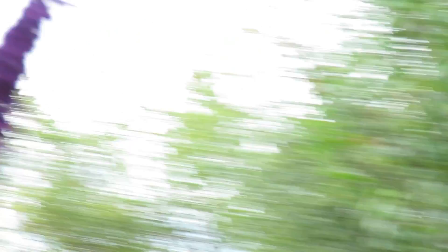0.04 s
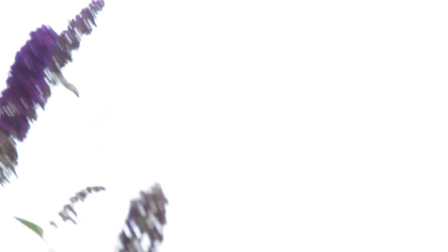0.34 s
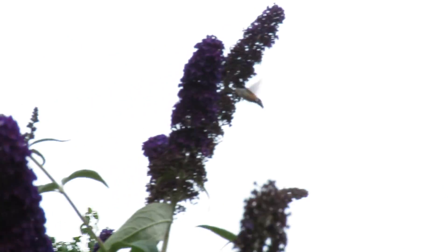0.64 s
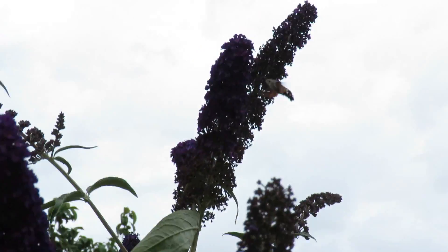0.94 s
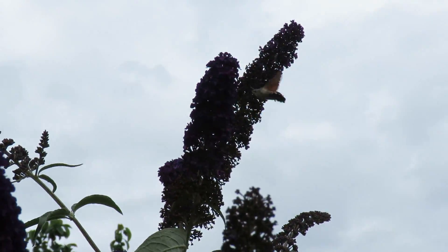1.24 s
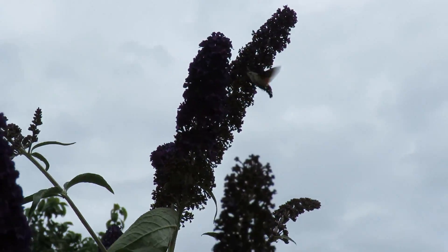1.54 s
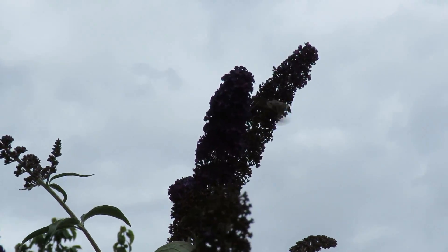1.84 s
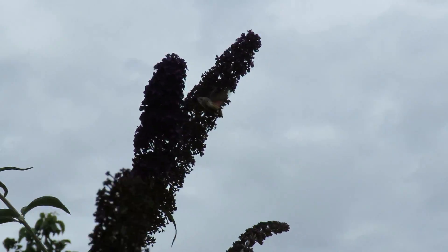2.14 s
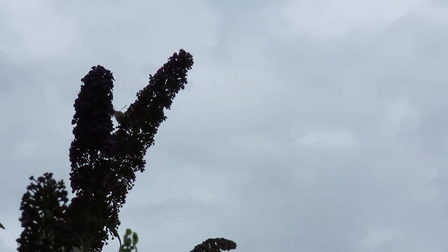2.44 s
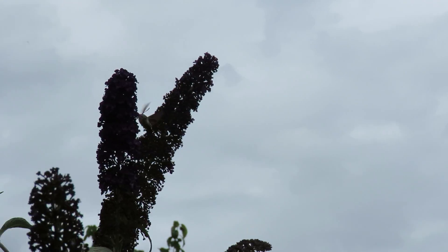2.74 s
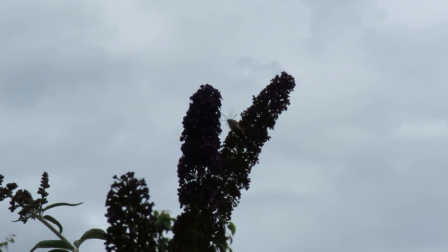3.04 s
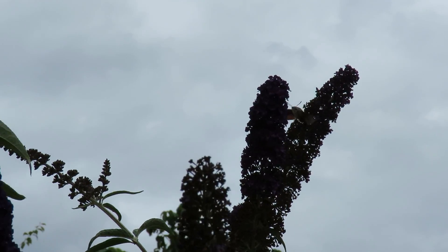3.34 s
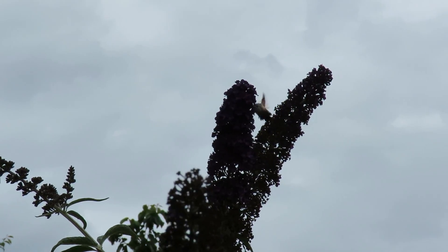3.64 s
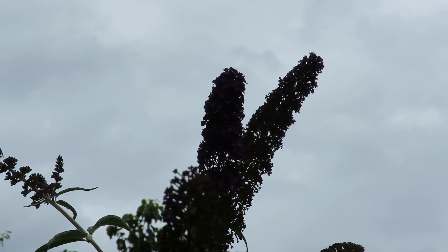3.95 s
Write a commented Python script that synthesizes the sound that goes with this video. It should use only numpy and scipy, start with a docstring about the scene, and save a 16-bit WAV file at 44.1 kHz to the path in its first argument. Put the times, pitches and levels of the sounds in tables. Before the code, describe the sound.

Uneven wind gusts rumble and pop against a handheld camera's microphone outdoors, strongest in the middle and weaker at the end. A faint lens whine and hand rubbing come first, over softly hissing leaves and a far traffic murmur.

```python
"""Gusty wind in a garden

Gusts buffet a camera's two microphone openings; each eddy (a swirl of air) hits one, then the other.
Behind them far traffic murmurs, leaves hiss, the camera rubs in the hand and its lens motor whines.
The hardest buffets drive the recorder's limiter, which turns the whole garden down for a moment."""
import sys
import numpy as np
from scipy import signal
from scipy.fft import rfft, irfft
from scipy.io import wavfile
from scipy.ndimage import uniform_filter1d

SR = 44100
rng = np.random.default_rng(int(sys.argv[2]) if len(sys.argv) > 2 else 0)


def master(y):
    """Save y as 16-bit WAV."""
    cut = np.clip(np.atleast_2d(y).T, -1, 1)
    pcm = np.round(cut * 32767)  # scale
    wavfile.write(sys.argv[1], SR, pcm.astype(np.int16))


N = 176400
TIME = np.arange(N) / SR


def amp(db):
    """Turns decibels into a gain."""
    return 10 ** (np.asarray(db) / 20)


def unit_rms(x):
    """Scales a signal to an average power of 1."""
    return x / np.sqrt(np.mean(x ** 2) + 1e-20)


def at_hz(points, hz):
    """Reads a curve along a logarithmic frequency axis."""
    f, value = np.transpose(points)
    return np.interp(np.log(hz + 1), np.log(f + 1), value)


def over_time(points):
    """Reads a curve at every sample."""
    return np.interp(TIME, *np.transpose(points))


def add(mix, start_s, sound):
    """Mixes in a stereo sound."""
    part = mix[:, max(round(start_s * SR), 0):][:, :sound.shape[1]]
    part += sound[:, :part.shape[1]]


def wander(rate_hz, size=N):
    """Smooth random motion up to about the given rate."""
    hz = np.fft.rfftfreq(size, 1 / SR)
    return unit_rms(irfft(rfft(rng.standard_normal(size)) * np.exp(-(hz / rate_hz) ** 2), size))


def stereo_noise(spectrum, alike, lag_s=0, speed=1, size=N):
    """Shaped noise, partly shared by both sides (alike: 0 to 1); the left hears it lag_s later."""
    hz = np.fft.rfftfreq(size, 1 / SR)
    shared, separate = rfft(rng.standard_normal((2, size)))
    likeness = alike if np.isscalar(alike) else at_hz(alike, hz)
    left = shared * np.exp(-2j * np.pi * hz * lag_s)
    right = likeness * shared + np.sqrt(1 - likeness ** 2) * separate
    return unit_rms(irfft(np.array([left, right]) * amp(at_hz(spectrum, hz / speed)), size))


def crossing(lag_ms, loss_db_per_ms=0.8):
    """Left and right gains: an eddy weakens on its way, so the later side gets less."""
    return amp(loss_db_per_ms * lag_ms * np.array([[-.5], [.5]]))


def swing(db, hz, half_ms, lag_ms):
    """One short pressure swing at both openings, centred 0.05 s after its start."""
    ms = np.arange(-50, 50, 1000 / SR) - np.array([[lag_ms], [-lag_ms]]) / 2
    return crossing(lag_ms) * amp(db) * np.sin(2 * np.pi * hz * ms / 1000) / np.cosh(ms / half_ms)


# Tone of the traffic: f/Hz, relative level/dB
TRAFFIC_TONE = [(20, -53), (55, -3.5), (120, 2), (250, -1.5), (480, -2.5), (750, -5), (960, -11.5),
                (1030, -5.5), (1100, -13.5), (1500, -18.5), (2200, -29.5), (5000, -63.5)]
# How loud it is: t/s, level/dB
TRAFFIC_LEVEL = [(0, -48.5), (.6, -50.5), (1.3, -49.5), (2.2, -52), (3.0, -52), (3.6, -50), (4, -52)]
def traffic():
    """Far roads make a dull murmur from all around."""
    return amp(over_time(TRAFFIC_LEVEL)) * stereo_noise(TRAFFIC_TONE, alike=0.41)


# Tone of the leaves: f/Hz, relative level/dB
LEAF_TONE = [(300, -11.5), (1000, 5), (1900, 1.5), (3900, -1.5), (5000, -4.5), (6500, -9), (11000, -16),
             (13000, -16.5), (14500, -27)]
# How loud they are: t/s, level/dB
LEAF_LEVEL = [(0, -57), (.4, -56), (1.8, -56), (2.9, -56), (4, -56.8)]
# How alike left and right are: f/Hz, likeness (0 to 1)
LEAF_LIKENESS = [(500, 0.37), (2200, 0.2), (3500, 0.53), (5000, 0.79), (6500, .38), (9000, .3),
                 (12000, 0.62), (14000, .85)]
def leaves():
    """Leaves in the bushes make a wide, even hiss, a little to the right."""
    return amp(over_time(LEAF_LEVEL)) * stereo_noise(LEAF_TONE, LEAF_LIKENESS, lag_s=30.3e-6)


# The motor's whine: t/s, level/dB, f/Hz
MOTOR_WHINE = [(0, -72, 1567), (.2, -56, 1493), (.28, -71, 1548), (.42, -54.5, 1601), (.57, -65, 1600),
               (.66, -54.5, 1615), (0.799, -97, 1555), (.97, -63.5, 1485), (1.5, -61.5, 1480),
               (1.75, -80, 1496)]
def lens_motor(width_hz=135):
    """A faint, unsteady whine whose pitch follows the motor's speed."""
    times, db, hz = np.transpose(MOTOR_WHINE)
    phase = 2 * np.pi * np.cumsum(np.interp(TIME, times, hz)) / SR
    whine = wander(width_hz) * np.cos(phase) + wander(width_hz) * np.sin(phase)
    return amp(np.interp(TIME, times, db)) * whine


# Tone of the rubbed camera body: f/Hz, relative level/dB
RUB_TONE = [(200, -12), (700, -13), (1150, -0.5), (1400, -1.5), (1800, -7), (2100, -12.5), (4000, -15.5),
            (8000, -61)]
# How loud the rubbing is: t/s, level/dB
RUB_LEVEL = [(0, -61.5), (.06, -50.5), (.26, -62.5), (.41, -54), (.57, -62), (.66, -56.5), (.76, -61.5),
             (1.1, -60), (1.4, -56), (1.75, -68), (4, -64.5)]
# Small ticks of the body: t/s, level/dB
BODY_TICKS = [(0.4002, -38), (0.4054, -32.5)]
def handling(grain_db=2.5):
    """The camera body carries the hand's uneven rubbing and small ticks to both microphones."""
    rub = stereo_noise(RUB_TONE, alike=0.95) * amp(grain_db * wander(rate_hz=60))
    out = amp(over_time(RUB_LEVEL)) * unit_rms(rub)
    for centre_s, db in BODY_TICKS:
        add(out, centre_s - .05, swing(db, hz=1590, half_ms=0.41, lag_ms=0))
    return out


# Tone of swirling air at speed 1: f/Hz, relative level/dB
EDDY_TONE = [(18, -53.5), (35, -26.5), (70, -15), (130, 3.5), (290, 1.5), (420, -4.5), (540, -12.5),
             (780, -28), (2000, -46), (4000, -87)]
# How alike it is at the two openings: f/Hz, likeness (0 to 1)
EDDY_LIKENESS = [(50, 0.76), (150, 0.78), (300, 0.69), (600, 0.51)]
def turbulence(speed, lag_ms, size, steadying=0.59, lump_db=4):
    """A stream of eddies makes lumpy pressure noise; speed multiplies its frequencies."""
    pressure = crossing(lag_ms) * stereo_noise(EDDY_TONE, EDDY_LIKENESS, lag_ms / 1000, speed, size)
    power = (pressure ** 2).mean(0)
    power = uniform_filter1d(uniform_filter1d(power, size=600), size=600)
    steadied = pressure / (abs(power) + 1e-9) ** (steadying / 2)
    lumps = amp(lump_db * np.tanh(wander(rate_hz=68.5, size=size)))
    return unit_rms(steadied * lumps)


# Light air: t/s, level/dB
BREEZE_LEVEL = [(0, -59), (.4, -49.5), (.7, -47), (1.0, -57.5), (1.2, -50), (1.33, -55), (1.56, -41.5),
                (2.1, -32.5), (2.28, -43), (2.6, -46), (2.67, -30), (3.05, -53), (3.33, -50.5), (3.55, -46),
                (3.75, -56.5), (4, -70)]
# Gusts: t/s, length/s, level/dB, speed factor, left delay/ms
WIND_GUSTS = [(0.245, 0.076, -43, 0.53, 2.3), (0.506, 0.021, -37, 0.68, 1.4), (.645, 0.076, -29, 0.7, 2),
              (0.74, 0.099, -32, 0.58, 3), (0.83, 0.13, -39.5, 0.54, 3), (1.087, .05, -43.5, 0.51, 1.5),
              (1.398, 0.1, -36, 0.59, 1.5), (1.468, 0.019, -29.5, 0.92, 1), (1.565, 0.15, -30, 0.96, 1.0),
              (1.701, 0.05, -37.5, 0.86, 0.6), (1.785, 0.096, -23.5, 0.89, 1.46),
              (1.916, 0.049, -18, 1, 1.63), (1.985, 0.065, -22, 0.85, -1.4),
              (2.058, 0.072, -16.5, 1.005, -1.77), (2.146, 0.052, -27.5, 1.06, 0.5),
              (2.213, 0.072, -38, 0.86, 0.6), (2.39, 0.039, -27, 1.3, 0), (2.438, 0.017, -20.5, 2.2, 0.5),
              (2.474, 0.091, -33, 0.89, 0.2), (2.676, 0.077, -21.5, 1.5, 0.3),
              (2.721, 0.096, -22.5, 1.32, -0.03), (2.823, 0.095, -30.5, 1, 0.2),
              (2.941, 0.13, -36.5, 0.94, 0.1), (3.138, 0.14, -40, 0.92, 0.54),
              (3.638, 0.043, -34.5, 0.81, 0.33), (3.706, 0.07, -42.5, 0.86, -0.05)]
# Single hard eddies: t/s, level/dB, f/Hz, half length/ms, left delay/ms
HARD_EDDIES = [(0.465, -14.5, 201, 1.74, 2.72), (0.653, -17.5, 186, 3.2, 3.5), (.672, -14, 168, 1.1, 1),
               (0.71, -16.5, 175, 2.6, 2.5), (0.7912, -8.5, 752, 0.48, 0.24),
               (0.7914, 0, 185.6, 1.12, 2.23), (.811, -19.5, 172, 2.8, 4.5), (1.196, -27.5, 166, 1.4, 1.4),
               (1.445, -19, 285, 1.1, 0.9), (1.571, -13.5, 300, 1.0, 1), (1.597, -11.5, 283, 1.34, 1.6),
               (1.646, -12.5, 201, 1.1, 2), (1.810, -8.5, 195, 1.66, 1.5), (1.833, -10, 231, 1.2, 2),
               (1.863, -4.5, 333, 0.85, 0.6), (1.931, -9, 155, 2.5, 0.5), (1.935, -2.5, 383, 2.13, 1.6),
               (2.028, -11, 288, 1.5, -1), (2.071, -17.5, 540, 1.4, -0.2), (2.192, -14.5, 350, 0.84, 0.2),
               (2.258, -23, 295, 2.1, 0.8), (2.3, -29.5, 405, 1.6, 2), (2.324, -28, 351, 1.6, 2.4),
               (2.4171, -2.5, 374, 0.65, 0.45), (2.439, 2.5, 470, 0.39, 0.4),
               (2.4416, -4.5, 617, 2.45, 0.4), (2.447, -1.5, 293, 1.5, 0.55), (2.682, -8, 284, 1.87, 0.42),
               (2.717, -7, 764, 0.6, 0.4), (2.740, -9.5, 415, 1.2, 0.7), (2.786, -13, 306, 3.4, 0.3),
               (2.881, -22, 240, 1.1, 0.6), (2.89, -17, 235, 0.85, 2.2), (2.904, -7, 361, 1.2, 1.26),
               (2.939, -21.5, 277, 1.3, 0.5), (2.958, -20, 243, 1.4, 0.5), (3.26, -28, 242, 2.3, 0.5),
               (3.403, -27.5, 222, 1.45, 0.63), (3.517, -28.5, 225, 1.14, -0.1),
               (3.587, -28.5, 267.6, 1.9, 0)]
def wind(rise_s=0.0056, fall_s=0.0056):
    """Air pushes on the openings: a breeze, gusts that rise, hold and fall, and hard eddies."""
    out = amp(over_time(BREEZE_LEVEL)) * turbulence(speed=0.76, lag_ms=0.47, size=N)
    t = np.arange(2 ** 14) / SR
    for start_s, length_s, db, speed, lag_ms in WIND_GUSTS:
        rise = np.sin(np.pi / 2 * np.minimum(t / rise_s, 1))
        shape = rise * np.exp(-np.maximum(t - length_s, 0) / fall_s)
        gust = shape * turbulence(speed, lag_ms, size=len(t))
        add(out, start_s, amp(db) * unit_rms(gust) * np.sqrt(np.mean(shape ** 2)))
    for centre_s, *eddy in HARD_EDDIES:
        add(out, centre_s - .05, swing(*eddy))
    return out


# How much wind gets through the openings: f/Hz, gain/dB
OPENING_GAIN = [(450, 1), (560, -8), (720, -10), (2500, -8.5)]
def openings(air, widen_db=3):
    """The microphone openings dull the wind; the stereo pair widens it."""
    hz = np.fft.rfftfreq(N, 1 / SR)
    dulled = irfft(rfft(air) * amp(at_hz(OPENING_GAIN, hz)), N)
    mid = dulled.mean(0)
    return mid + amp(widen_db) * (dulled - mid)


# How far the bass moves to the centre: t/s, share (0 to 1)
BASS_CENTRING = [(1.14, 0), (1.19, 0.86), (1.55, 0.7), (1.8, 0.34), (2.14, 0.3), (2.18, 0.98)]
def narrow_bass(x, below_hz=274, slope=2.1):
    """At times the deep rumble draws in to the centre, while the rest stays wide."""
    mid, side = x.mean(0), (x[0] - x[1]) / 2
    hz = np.fft.rfftfreq(N, 1 / SR)
    side_bass = irfft(rfft(side) / (1 + (hz / below_hz) ** slope), N)
    side = side - over_time(BASS_CENTRING) * side_bass
    return np.array([mid + side, mid - side])


def scene():
    """Wind on the microphones, over the quiet garden and the camera's own noises."""
    return narrow_bass(openings(wind()) + leaves() + traffic() + handling() + lens_motor())


def record(dry, limit_db=-4, attack_s=0.0069, recover_db_per_s=12.5, top_hz=14600):
    """A limiter dips just ahead of loud peaks and recovers slowly; the highest treble is cut."""
    peak_db = 20 * np.log10(abs(dry).max(0) + 1e-9)
    over_db = np.maximum(peak_db - limit_db, 0)
    recovery_db = TIME * recover_db_per_s
    dip_db = np.maximum.accumulate(over_db + recovery_db) - recovery_db
    span = int(attack_s * SR) + 1
    dip_db = uniform_filter1d(uniform_filter1d(dip_db, span), span)
    low_pass = signal.firwin(255, top_hz, window=("kaiser", 9), fs=SR)
    return signal.oaconvolve(dry * amp(-dip_db), low_pass[None], "same", axes=1)


dry = scene()
out = record(dry)
master(out)
```